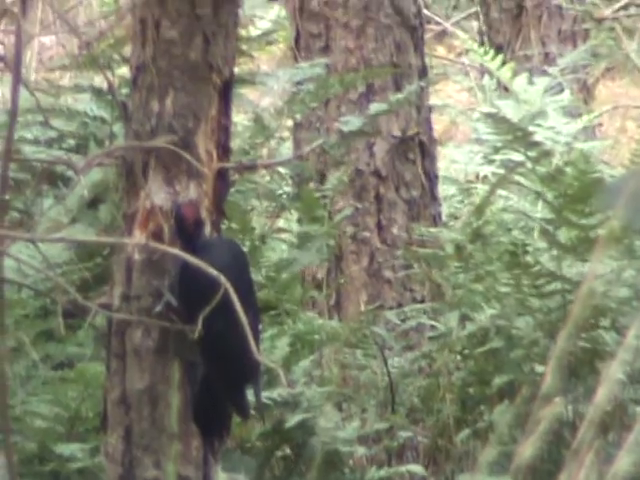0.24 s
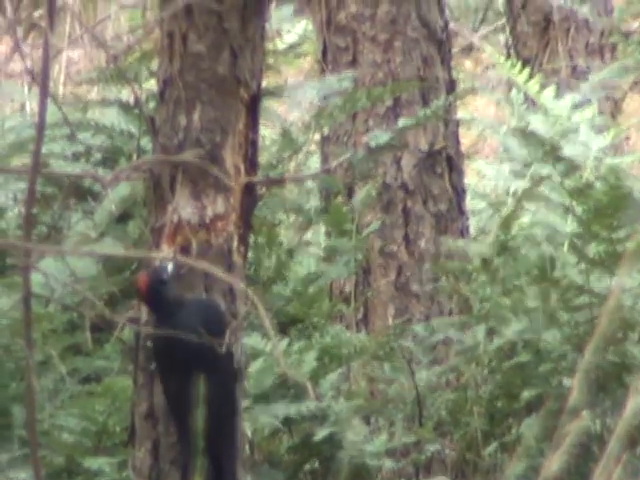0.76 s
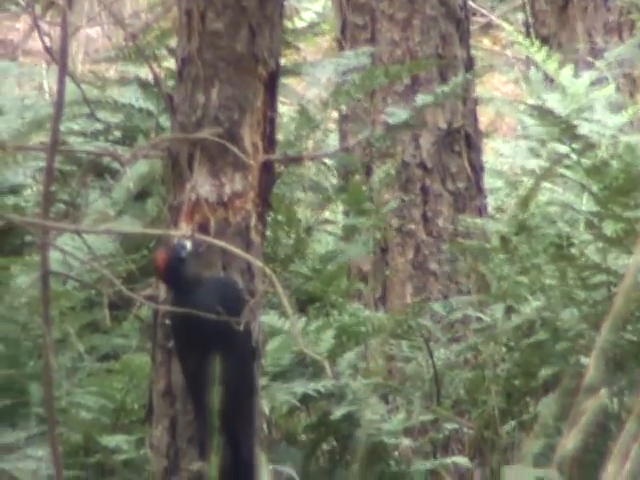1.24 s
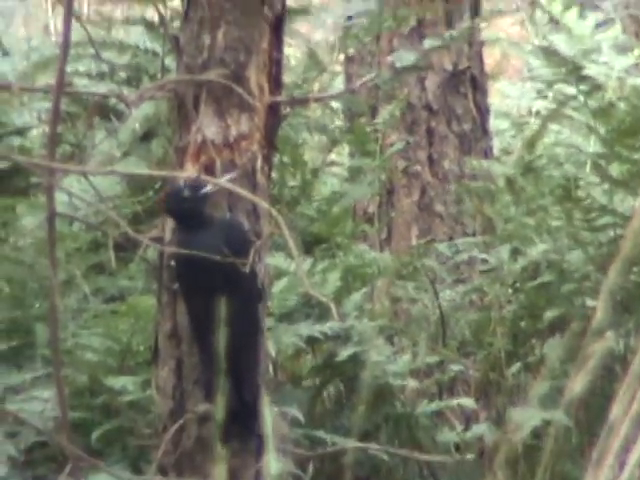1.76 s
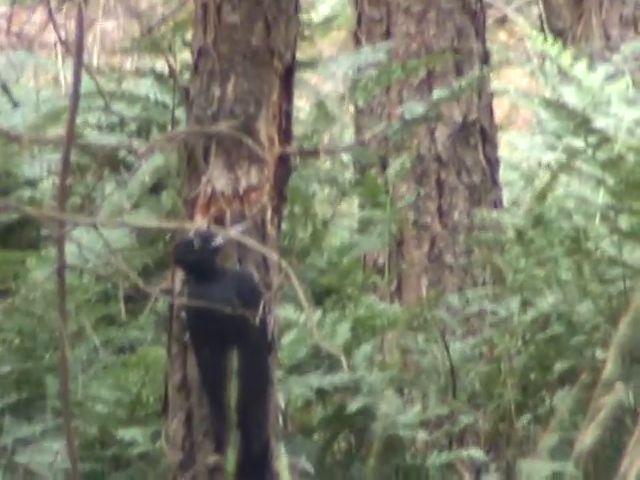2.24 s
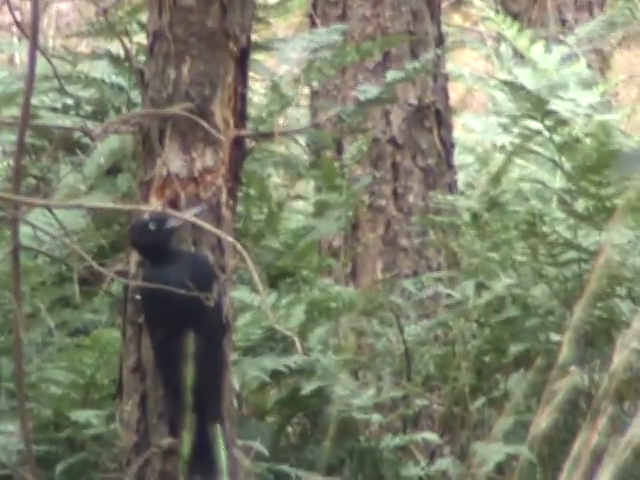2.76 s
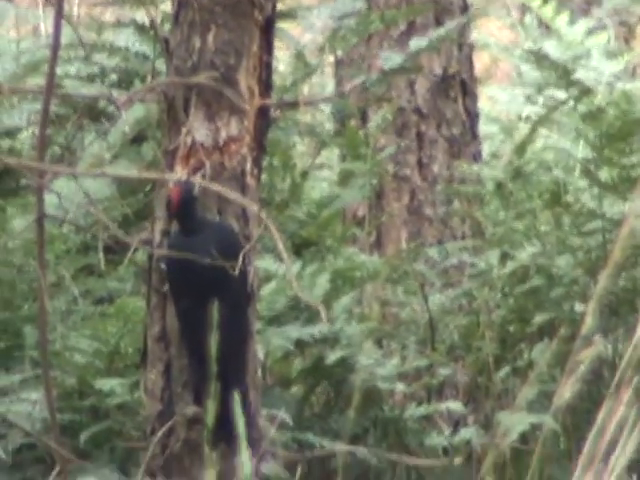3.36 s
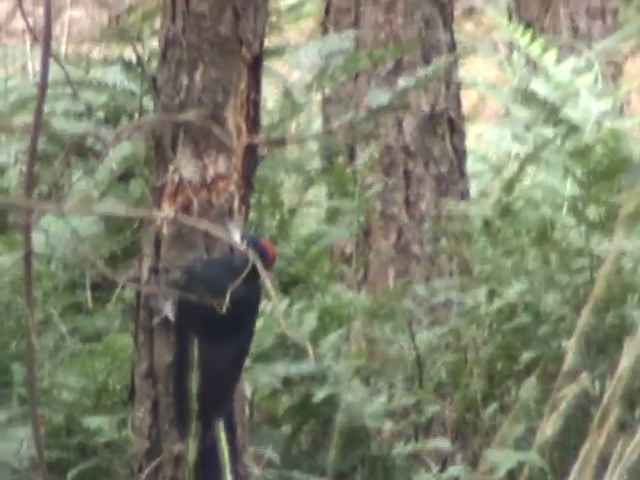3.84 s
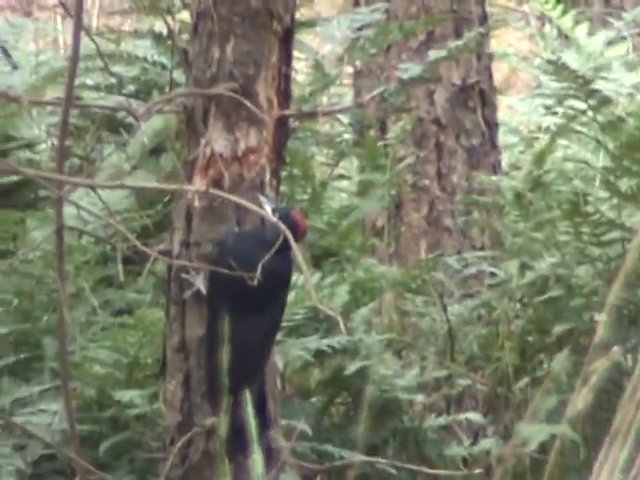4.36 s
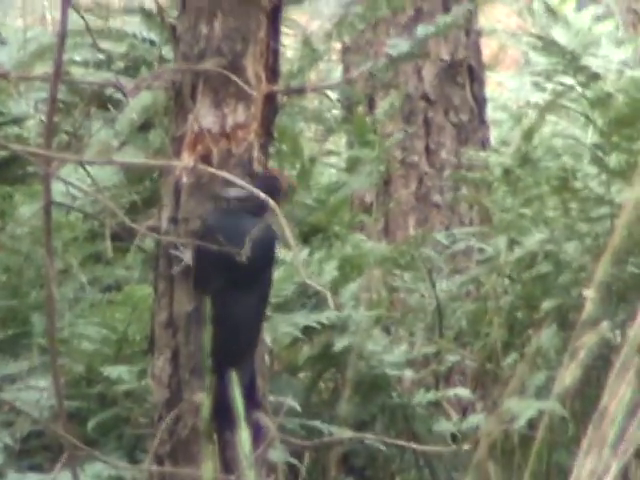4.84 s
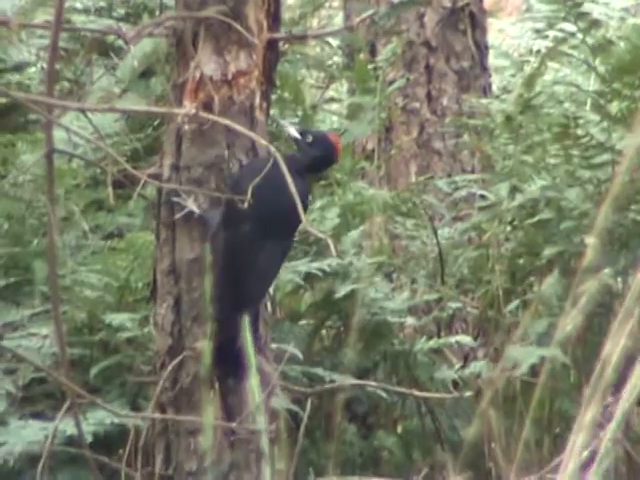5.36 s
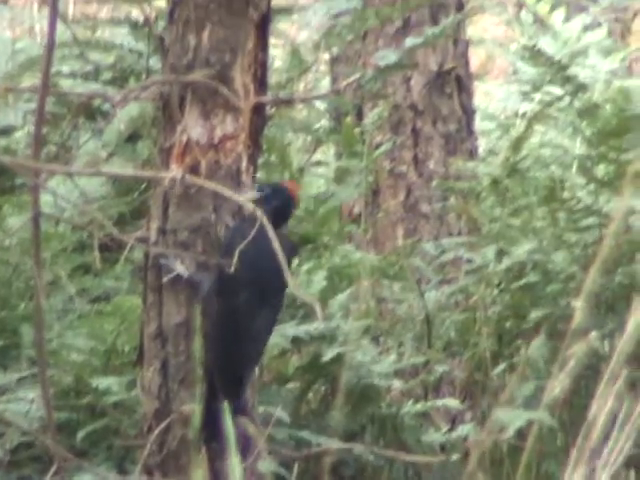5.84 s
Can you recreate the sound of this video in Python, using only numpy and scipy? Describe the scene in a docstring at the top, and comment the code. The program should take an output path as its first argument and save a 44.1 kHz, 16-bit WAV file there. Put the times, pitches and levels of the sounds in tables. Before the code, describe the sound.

A quiet forest with a soft, steady hiss of air. During the first 1.5 seconds leaves rustle faintly, a distant small bird sings a short falling phrase and another gives thin, high calls. Slightly left of centre, a woodpecker's claws tick on bark, and it strikes the trunk at about 0.8 seconds with a dry, sharp knock and a light echo. Sparse taps follow, with faint bark squeaks and a scrape between 1.4 and 1.9 seconds. From about 2 seconds a camera's focus motor ticks very faintly. The pecking gets busier from 2.9 seconds, uneven and splintery, with two stronger knocks around 3.6 seconds and brief claw scratches in between. The loudest blows come in a tight cluster at 5.1 seconds. A chip patters softly down, more knocks land around 5.5 seconds, and a dry twig snaps further off at 5.8 seconds.

```python
"""A black woodpecker chisels and prises bark off a pine in a quiet forest.
Each blow of the bill is a brief crunch of breaking fibres that excites the modes of the trunk, a loose
bark plate and fine splinters; the shorter the crunch, the brighter the blow. Between blows the claws
tick and drag, the plate squeaks and a chip patters down. Small birds call far off, leaves rustle and
settle, a twig snaps, and the camera's focus motor ticks faintly."""
import sys
import numpy as np
from scipy import signal
from scipy.fft import rfft, irfft
from scipy.io import wavfile

SR = 44100
rng = np.random.default_rng(int(sys.argv[2]) if len(sys.argv) > 2 else 0)


def wav_record(signal):
    """Record a signal, one row per channel, as 16-bit PCM in the file named by sys.argv[1]."""
    frames = np.transpose(np.atleast_2d(signal))
    bounded = np.clip(frames, -1, 1)
    # unit amplitude maps onto the largest positive 16-bit level
    quanta = np.round(bounded * 32767).astype(np.int16)
    wavfile.write(sys.argv[1], SR, quanta)


N = 268789
TIME = np.arange(N) / SR
IMPACT_TIME = TIME[:SR // 16]
IMPACT_GAIN = np.sqrt(SR / 100)   # gives a unit-energy impact the energy of 10 ms at rms 1
CRUNCH_S, SPLINTER_HZ = .0011, 6420   # a typical crunch: its duration and its splinters' frequency


def from_db(db):
    """Amplitude ratio: a factor of ten for every 20 dB."""
    return 10 ** (np.asarray(db) / 20)


def unit_energy(x):
    """Energy normalisation: the squares of each channel sum to 1."""
    return x / np.sqrt(np.sum(x ** 2, axis=-1, keepdims=True) + 1e-20)


def add(track, s, sound):
    """Superposition: a sound joins the track at s seconds."""
    start = max(0, int(s * SR))
    part = sound[..., :max(0, N - start)]
    track[..., start:start + part.shape[-1]] += part


def band(x, low_hz, high_hz):
    """Causal band-pass filtering."""
    edges_hz = [low_hz, min(high_hz, SR / 2 - 1000)]
    return signal.sosfilt(signal.butter(2, edges_hz, "band", fs=SR, output="sos"), x)


def decay(t60):
    """Exponential damping: 60 dB in t60 seconds."""
    return np.exp(-np.log(1000) * TIME / t60)


def ring(x, hz, t60):
    """Damped oscillator: a unit impulse starts a sinusoid of amplitude about 1."""
    r = np.exp(-np.log(1000) / (t60 * SR))
    w = 2 * np.pi * hz / SR
    response = signal.lfilter([np.sin(w), -np.sin(w)], [1, -2 * r * np.cos(w), r * r], x + 1e-18)
    return response / (2 * np.sin(w / 2))


def resound(force, modes, centre_hz, focus_db, uneven_db=0.0):
    """Modal superposition: the point struck favours modes near centre_hz, by focus_db at one octave."""
    out = 0
    for hz, db, t60 in modes:
        gain = from_db(db - focus_db * np.log2(hz / centre_hz) ** 2 + rng.normal(0, uneven_db))
        out = out + gain * ring(force, hz, t60)
    return out


def noise(spectrum, diffuse=False):
    """Coloured stereo noise of rms 1: coherence depends on frequency, or is zero if diffuse."""
    # left-right coherence: f/Hz, correlation
    coherence = [(30, .99), (125, 0.98), (290, 0.79), (640, 0.44), (1400, 0.024), (3100, 0.33),
                 (6800, 0.75), (15000, 0.98)]
    log_hz = np.log(np.fft.rfftfreq(N, 1 / SR) + 1)

    def curve(points):
        hz, values = np.transpose(points)
        return np.interp(log_hz, np.log(hz), values)

    alike = 0 if diffuse else np.clip(curve(coherence), 0, 1)
    mid, side = rfft(rng.standard_normal((2, N)))
    pair = np.sqrt(1 + alike) * mid + np.sqrt(1 - alike) * side * [[1], [-1]]
    return unit_energy(irfft(pair * from_db(curve(spectrum)), N)) * np.sqrt(N)


def hush(level_db=-56):
    """Stationary broadband noise: forest air and microphone hiss."""
    # noise spectrum: f/Hz, relative spectral level/dB
    spectrum = [(25, -16.5), (58, -0.5), (90, -4.5), (170, 0), (330, -0.5), (650, -1), (1000, -5),
                (1500, -7.5), (2800, -14.5), (4500, -13.5), (6500, -13), (11000, -16.5), (16000, -18)]
    return from_db(level_db) * noise(spectrum)


def leaves(flutter_db=2.0, flutters_per_s=120):
    """Random amplitude modulation: the rustle flutters as single fronds brush each other."""
    # envelope before the flutter: t/s, level/dB
    envelope = [(0, -54), (.9, -56), (1.12, -56), (1.3, -60), (2.2, -64), (3.3, -67), (5.0, -65.5),
                (6.09, -63)]
    # rustle spectrum: f/Hz, relative spectral level/dB
    spectrum = [(400, -6.5), (1000, -2), (1500, -5), (2300, -0.5), (3300, -2), (4600, -5.5), (7000, -7),
                (9500, -17.5), (13000, -21), (16000, -22)]
    flutter = np.interp(TIME * flutters_per_s, np.arange(N), rng.standard_normal(N))
    return from_db(np.interp(TIME, *np.transpose(envelope)) + flutter_db * flutter) * noise(spectrum)


def focus_motor(start_s=1.9125, ticks_per_s=25, uneven_db=3.5, wander_db=1.0):
    """Impulse-train excitation: each evenly timed nudge of the lens rings the housing softly."""
    # housing modes: f/Hz, level/dB, t60/s
    modes = [(1950, -58, 0.022), (2170, -55.5, 0.026)]
    ticks = (np.arange(start_s, TIME[-1], 1 / ticks_per_s) * SR).astype(int)
    load_db = wander_db * np.interp(ticks / SR * 4, np.arange(32), rng.standard_normal(32))
    out = np.zeros(N)
    for hz, db, t60 in modes:
        nudges = np.zeros(N)
        nudges[ticks] = from_db(db + load_db + rng.normal(0, uneven_db, len(ticks)))
        out += ring(nudges, hz, t60)
    return band(out, 1890, 2200)


def whistle(length, start_hz, fall_hz, waver):
    """Frequency modulation: a falling note swells and fades; waver is a fraction of its frequency."""
    u = np.linspace(0, 1, int(length * SR))
    jitter = np.interp(u, np.linspace(0, 1, 20), rng.standard_normal(20))
    hz = (start_hz - fall_hz * u) * (1 + waver * jitter)
    return 2 * np.sin(np.pi * u) * np.sin(2 * np.pi * np.cumsum(hz) / SR)


def birds(start_s=.25, step_s=.161, sag_hz_per_s=500, fade_db_per_s=4.0, scatter_t60=0.39):
    """Multipath scattering by trees smears a far song, which sinks and fades, and a second bird's calls."""
    # the second bird's thin calls: t/s, f/Hz, level/dB
    calls = [(0.05, 6950, -64), (0.275, 7200, -65), (.625, 6900, -60), (1.343, 6740, -61),
             (1.44, 6780, -66), (1.51, 6200, -65)]
    song = np.zeros(N)
    for k in range(6):
        elapsed = k * step_s
        swoop_hz = 380 if k == 0 else 0   # the first note swoops in from higher up
        start_hz = 3730 - sag_hz_per_s * elapsed + swoop_hz
        note = whistle(.135, start_hz, fall_hz=481 + swoop_hz, waver=.085)
        add(song, start_s + elapsed, from_db(-56.5 - fade_db_per_s * elapsed) * note)
    for s, hz, db in calls:
        add(song, s, from_db(db) * whistle(.06, hz, fall_hz=190, waver=0.012))
    paths = rng.standard_normal((2, SR)) + rng.standard_normal(SR)
    scatter = unit_energy(paths * decay(scatter_t60)[:SR])
    return signal.fftconvolve(song[None], scatter, axes=1)[:, :N]


def crunch(length, grain_db=6.5, crumbs_db=-21, crumbs_s=0.0039):
    """Acoustic emission: fibres break in a quick swell of uneven clicks; a few crumbs follow."""
    t = IMPACT_TIME
    swell = 4.5 * t / length * np.exp(-1.9 * t / length)
    clicks = rng.choice([-1, 1], len(t)) * from_db(grain_db * np.minimum(rng.exponential(1, len(t)), 3))
    return clicks * (swell + from_db(crumbs_db) * np.exp(-t / crumbs_s))


def twig(echo_db=-44.5, echo_t60=0.39):
    """Brittle fracture: a dry twig further off gives three bright cracks, then diffuse scatter."""
    # cracks: t/s, duration/s, level/dB
    cracks = [(5.827, 0.00079, -41.5), (5.8306, 0.00091, -33.5), (5.834, 0.0014, -41)]
    # response of the wood: f/Hz, relative spectral level/dB
    spectrum = [(700, -38), (1300, -9.5), (2200, 3.5), (2900, -6), (3700, 4.5), (5000, -7.5), (6800, 3),
                (9500, -12), (12000, -20), (16000, -37)]
    colour = from_db(np.interp(np.fft.rfftfreq(256, 1 / SR), *np.transpose(spectrum)))
    wood = signal.minimum_phase(np.roll(irfft(colour ** 2), 127)[:-1])   # that colour as a causal filter
    out = np.zeros((2, N))
    for s, length, db in cracks:
        crack = unit_energy(signal.lfilter(wood, 1, crunch(length)))
        add(out, s, from_db(db) * crack * IMPACT_GAIN)
    add(out, cracks[-1][0], from_db(echo_db) * noise(spectrum, diffuse=True) * decay(echo_t60))
    return out


def forest_echo(x, near_db=-15, near_t60=0.041, near_spread=0.18, far_db=-27, far_t60=1.0):
    """Reverberation: ferns and ground scatter at once; far trunks return a faint long tail."""
    # echo spectrum: f/Hz, relative spectral level/dB
    spectrum = [(300, -15), (750, 0), (1400, -2), (2500, -1.5), (4000, -4), (7000, -7.5), (12000, -8),
                (16000, -18)]
    mid, side = noise(spectrum, diffuse=True)
    near = (mid + near_spread * side * [[1], [-1]]) * decay(near_t60) * (1 - np.exp(-TIME / 0.0024))
    far = noise(spectrum, diffuse=True) * decay(far_t60) * (1 - np.exp(-TIME / 0.004))
    echoes = from_db(near_db) * unit_energy(near) + from_db(far_db) * unit_energy(far)
    return signal.fftconvolve(x[None], echoes[:, :SR], axes=1)[:, :N]


def from_left(x, left_db=1.37, shade=0.17):
    """Acoustic shadowing: the right channel is a little weaker, duller and later."""
    shaded = signal.lfilter([1 - shade], [1, -shade], x)
    return np.array([from_db(left_db) * x, from_db(-left_db) * shaded])


def knock(length, centre_hz, push_s=0.0002):
    """Impulse response of the trunk: the push lands as the fibres give way and sets it ringing."""
    # trunk modes: f/Hz, relative level/dB, t60/s
    modes = [(434, -10, 0.034), (641, -3.5, 0.032), (717, 2, 0.022), (874, 1, 0.021), (930, -16, 0.015)]
    push = np.exp(-.5 * ((IMPACT_TIME - 0.87 * min(length, .002)) / push_s) ** 2)
    ringing = resound(push, modes, centre_hz, focus_db=59.0, uneven_db=2.5)
    return unit_energy(band(ringing, 550, 1160))


def bark_crack(length, centre_hz):
    """Time-bandwidth reciprocity: a shorter crunch spreads over more modes of the loose bark plate."""
    # plate modes: f/Hz, relative level/dB, t60/s
    modes = [(1650, -6, 0.0077), (1883, 2.5, 0.01), (2100, -1.5, 0.014), (2527, -1, 0.0084),
             (2860, 0, 0.0054), (3300, -3.5, 0.0046), (3764, 3, 0.012), (4250, -22, .006),
             (4900, -13, 0.0041)]
    ringing = resound(crunch(length), modes, centre_hz, focus_db=32.0 * np.sqrt(length / CRUNCH_S))
    return unit_energy(band(ringing, 1350, 4800))


def splinters(length, hz, t60=0.0024, ring_db=-6.5, fizz_db=-13.0):
    """Fracture of fine fibres: a bright crack, a heavily damped resonance and a trace of fizz."""
    crack = unit_energy(band(crunch(length), 5300, 9280))
    fizz = unit_energy(band(crunch(length), 11000, 17000))
    ringing = unit_energy(ring(crack, hz, t60))
    return unit_energy(crack + from_db(ring_db) * ringing + from_db(fizz_db) * fizz)


def falling_chip(start_s=5.2846, gap_s=.021, restitution=.76, first_db=-57, loss_db=1.2):
    """Inelastic collisions: a loosened chip patters down the trunk, each bounce sooner and softer."""
    out, s = np.zeros(N), start_s
    for k in range(5):
        bounce = knock(CRUNCH_S, centre_hz=820) + from_db(-11) * splinters(CRUNCH_S, SPLINTER_HZ)
        add(out, s, from_db(first_db - loss_db * k) * bounce * IMPACT_GAIN)
        s += gap_s * restitution ** k
    return out


def stroke(length, hz, width_hz, grains_per_s=900, grain_db=4.5):
    """Stick-slip friction: tiny slips on rough bark feed one resonance, swelling and fading; rms 1."""
    u = np.linspace(0, 1, int(length * SR))
    chance, size, sign = rng.random((3, SR // 4))[:, :len(u)]
    strength = from_db(grain_db * np.minimum(-np.log(size), 3))
    slips = (chance < grains_per_s / SR) * np.sign(sign - .5) * strength
    rubbing = band(slips * np.sin(np.pi * u), max(hz - width_hz / 2, 100), hz + width_hz / 2)
    return unit_energy(rubbing) * np.sqrt(len(u))


def scraping(trunk_db=-2.5):
    """Frictional excitation: claws hiss over the trunk's murmur; the plate's narrow resonance squeaks."""
    # claws dragging over bark: t/s, duration/s, level/dB
    drags = [(1.789, 0.051, -55.5), (2.341, .095, -64.5), (2.595, 0.047, -63.5), (2.927, 0.052, -60.5),
             (3.278, 0.16, -64), (4.139, 0.049, -59), (4.998, .068, -63), (5.646, .05, -65)]
    # the bark plate being prised: t/s, duration/s, level/dB
    squeaks = [(1.361, 0.064, -66), (1.568, .13, -71), (1.672, .076, -62), (1.757, .085, -57)]
    out = np.zeros(N)
    for s, length, db in drags:
        murmur = from_db(trunk_db) * stroke(length, hz=810, width_hz=450)
        hiss = stroke(length, hz=5740, width_hz=3500, grains_per_s=350, grain_db=5.0)
        add(out, s, from_db(db) * (hiss + murmur))
    for s, length, db in squeaks:
        add(out, s, from_db(db) * stroke(length, hz=3770, width_hz=200))
    return out


def claws(crunch_s=.0013, tick_hz=6570, pitch_spread=0.13, bark_db=-6.5, trunk_db=-10):
    """Surface fracture: a catching claw breaks fibres with a thin tick and barely stirs bark and trunk."""
    # claw catches: t/s, level/dB
    catches = [(0.1381, -57), (0.153, -54), (0.1906, -56), (0.3636, -47), (0.739, -55), (2.0466, -54),
               (2.3882, -56), (4.1231, -49.5), (4.166, -55), (4.714, -59), (4.9488, -52)]
    out = np.zeros(N)
    for s, db in catches:
        tick = splinters(crunch_s, tick_hz * np.exp(rng.normal(0, pitch_spread)))
        plate = from_db(bark_db) * bark_crack(crunch_s, centre_hz=2900)
        thud = from_db(trunk_db) * knock(crunch_s, centre_hz=780)
        add(out, s, from_db(db) * (tick + plate + thud) * IMPACT_GAIN)
    return out


def pecking(splinter_db=-2.5, db_per_halving=10, octaves_per_halving=0.26):
    """Impact excitation of trunk, plate and splinters; shorter crunches give louder, higher splinters."""
    # blows of the bill: t/s, crunch duration/s, trunk level/dB, trunk f/Hz, plate level/dB, plate f/Hz
    blows = [(0.7645, 0.0021, -49, 754, -41.5, 3850), (0.822, .0018, -51, 870, -58.5, 1670),
             (1.1517, 0.00075, -60, 760, -52.5, 2000), (1.81, 0.00064, -54.5, 920, -45, 3200),
             (2.449, 0.0015, -68, 800, -54, 2520), (2.634, .001, -55, 930, -54, 2750),
             (2.9094, 0.00062, -44, 900, -40.5, 3050), (3.1335, 0.00091, -46.5, 710, -49, 4300),
             (3.186, .0011, -50, 690, -56.5, 2780), (3.251, .0009, -55.5, 796, -53.5, 1810),
             (3.307, 0.00093, -54, 940, -58, 3880), (3.315, 0.00072, -60, 850, -56, 2050),
             (3.5596, .0014, -47, 850, -44, 4400), (3.6271, 0.0012, -35.5, 676, -39, 1700),
             (3.669, .0012, -36.5, 730, -42, 1900), (3.8813, 0.00093, -49, 670, -49, 2430),
             (3.9132, .0018, -55.5, 800, -57, 2120), (3.991, 0.0015, -53, 714, -56, 2210),
             (4.013, .0018, -54.5, 690, -57.5, 2400), (4.455, .001, -54, 660, -63, 1700),
             (5.0641, 0.00085, -59, 760, -40.5, 2800), (5.08, 0.0014, -52, 660, -53, 3880),
             (5.1029, .0013, -34.5, 800, -36, 3600), (5.1056, .0013, -29, 990, -37, 3880),
             (5.1121, 0.0008, -37, 680, -29.5, 3250), (5.266, 0.00038, -55.5, 760, -44.5, 4250),
             (5.4408, 0.0015, -49.5, 735, -55, 2710), (5.4514, 0.0016, -44, 756, -44, 2650),
             (5.4782, 0.00075, -44.5, 850, -41, 4100), (5.486, 0.00143, -50, 890, -52, 1860),
             (5.6975, .0014, -56.5, 930, -56, 1650)]
    out = np.zeros(N)
    for s, length, trunk_db, trunk_hz, bark_db, bark_hz in blows:
        halvings = np.log2(CRUNCH_S / length)
        fibre_db = trunk_db + splinter_db + db_per_halving * halvings
        fibre_hz = SPLINTER_HZ * 2 ** (octaves_per_halving * halvings)
        thud = from_db(trunk_db) * knock(length, trunk_hz)
        plate = from_db(bark_db) * bark_crack(length, bark_hz)
        fibres = from_db(fibre_db) * splinters(length, fibre_hz)
        add(out, s, (thud + plate + fibres) * IMPACT_GAIN)
    return out


def scene():
    """Superposition: the woodpecker, a little left of centre, its echo and the forest's background."""
    woodpecker = pecking() + claws() + scraping() + falling_chip()
    air = hush()
    direct = from_left(woodpecker)
    return direct + forest_echo(woodpecker) + twig() + birds() + leaves() + air + focus_motor()


def record(dry, cutoff_hz=16000):
    """Band limiting: a steep elliptic low-pass removes the highest treble."""
    return signal.sosfilt(signal.ellip(10, .1, 70, cutoff_hz, fs=SR, output="sos"), dry)


dry = scene()
out = record(dry)
wav_record(out)
```